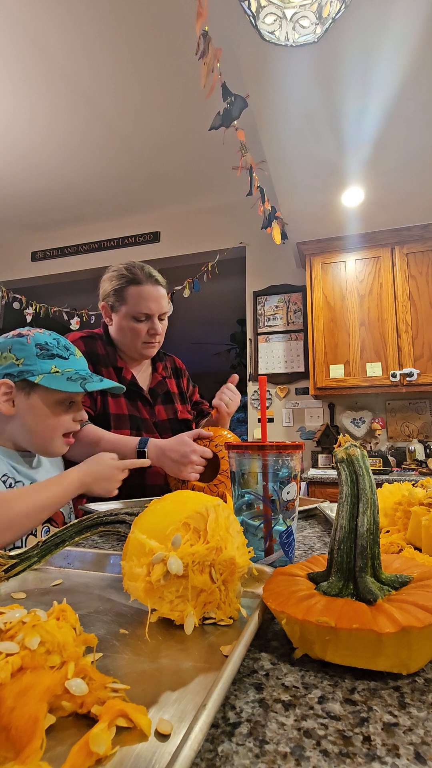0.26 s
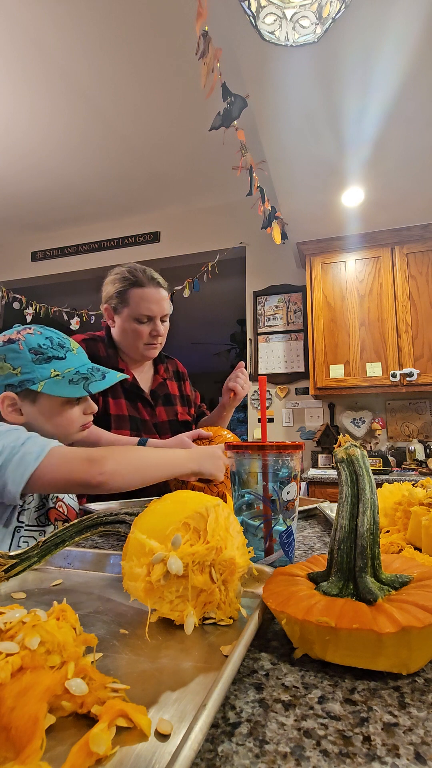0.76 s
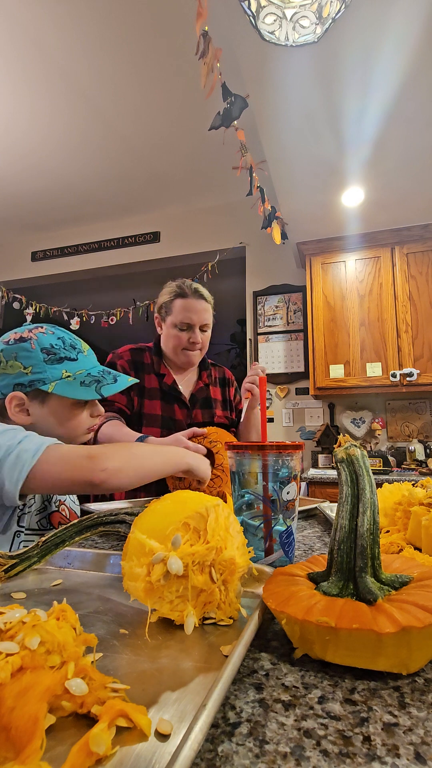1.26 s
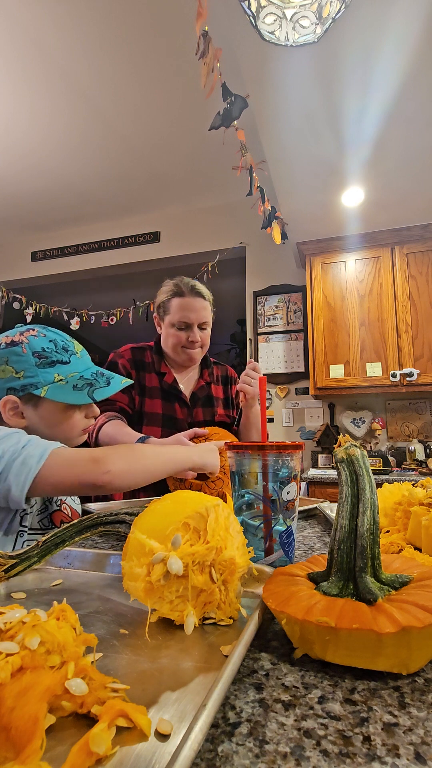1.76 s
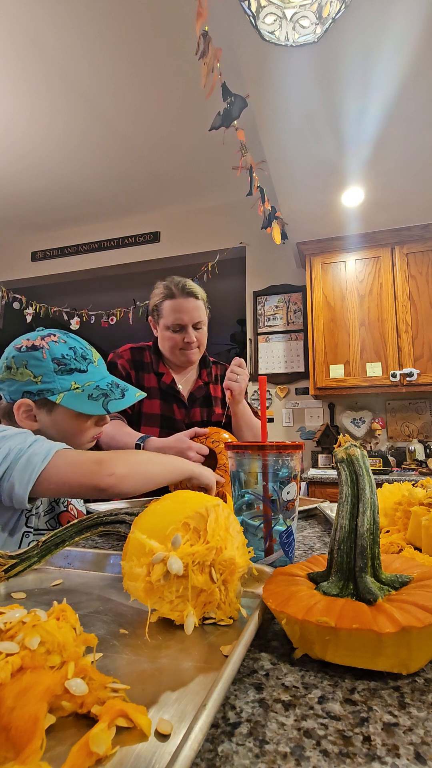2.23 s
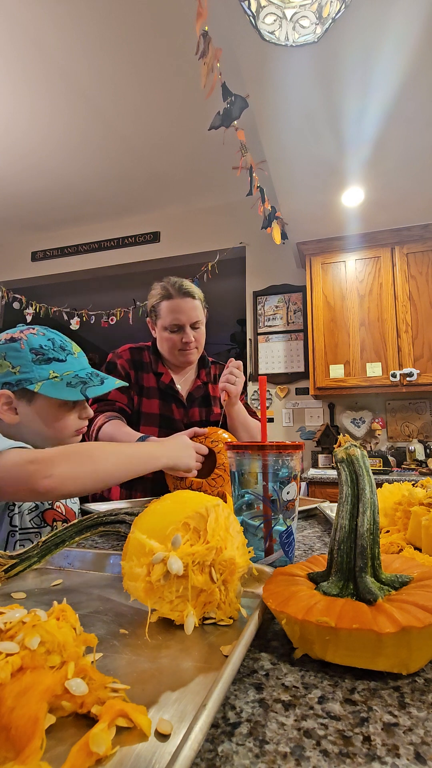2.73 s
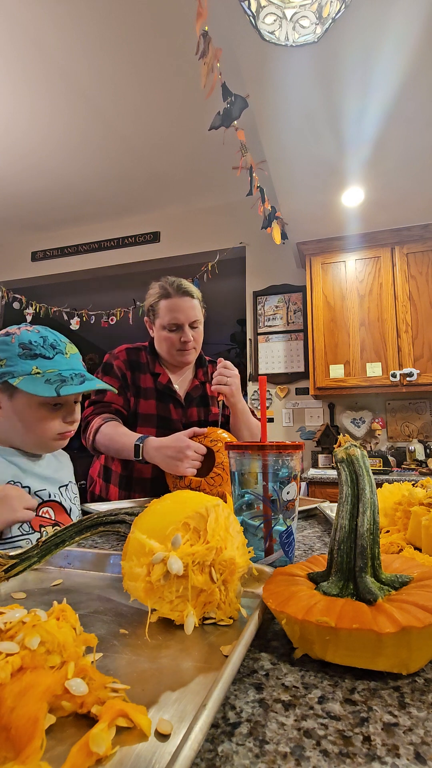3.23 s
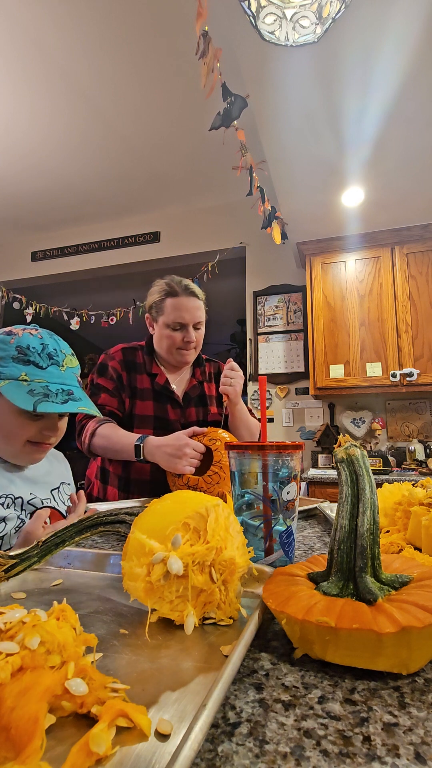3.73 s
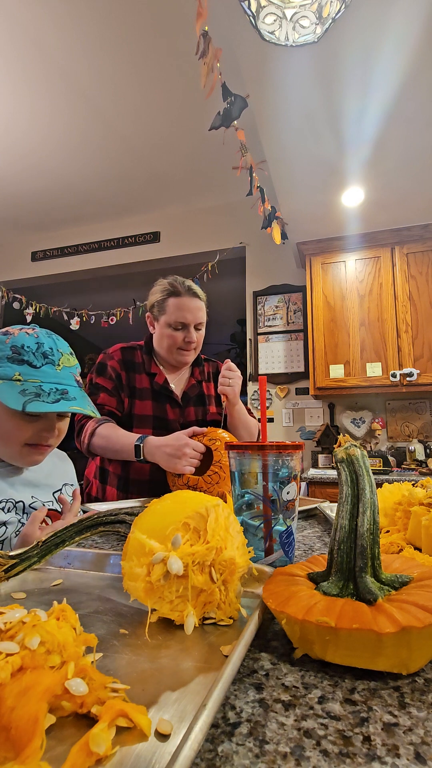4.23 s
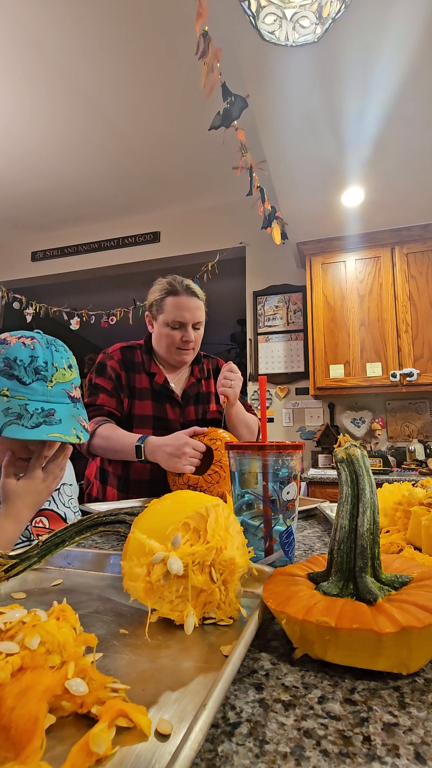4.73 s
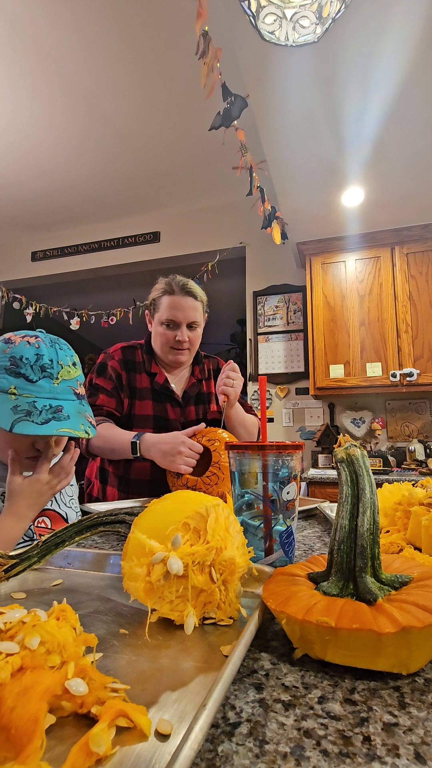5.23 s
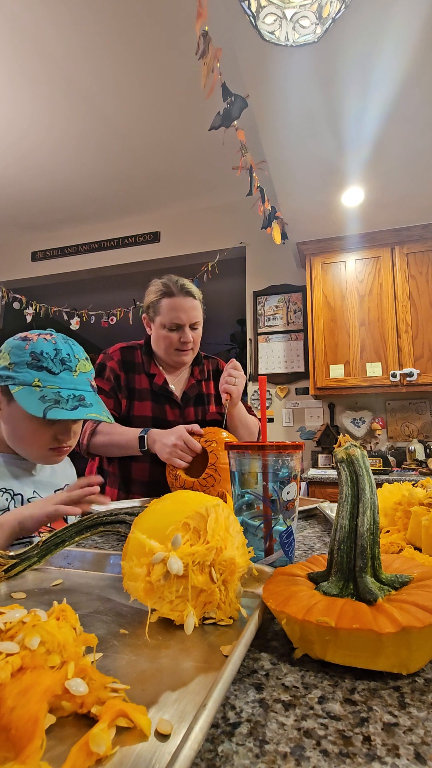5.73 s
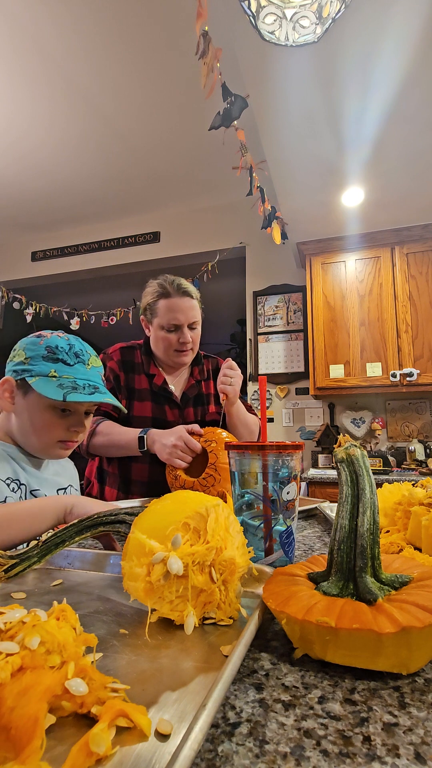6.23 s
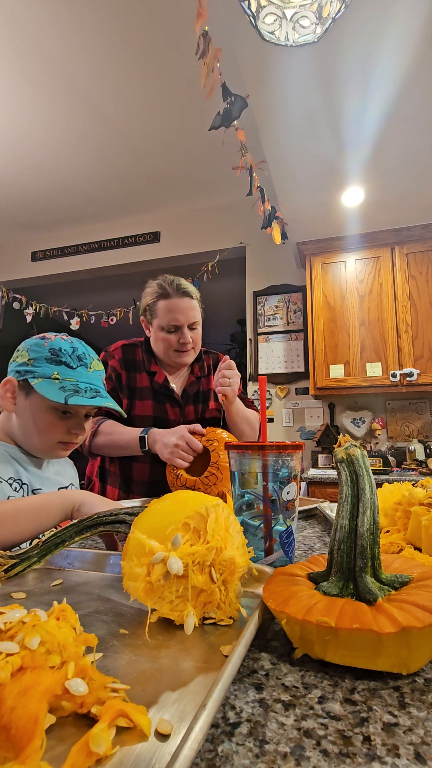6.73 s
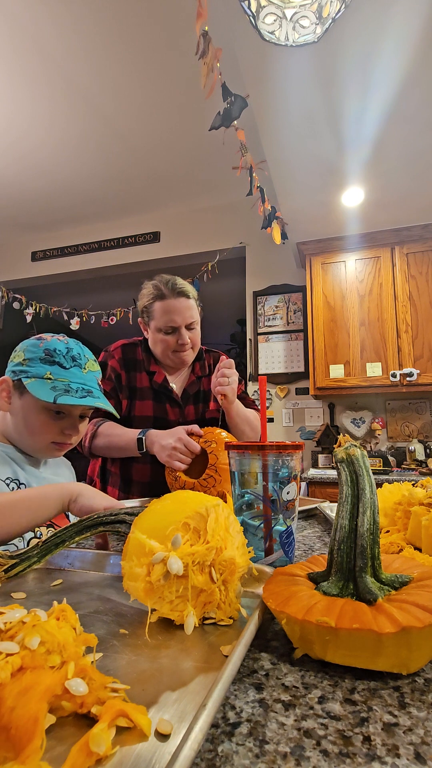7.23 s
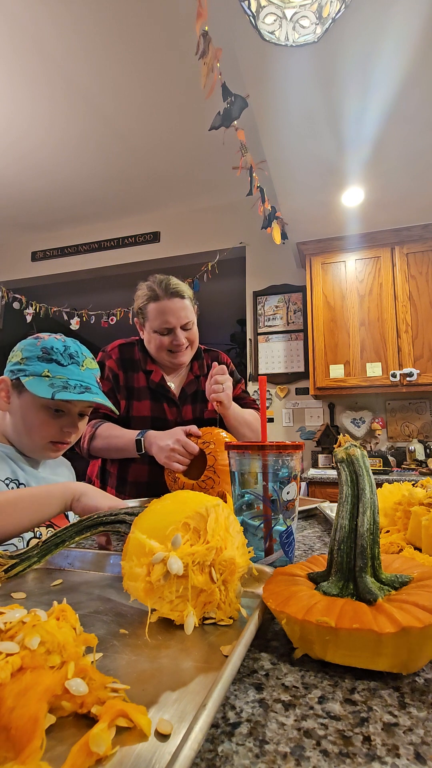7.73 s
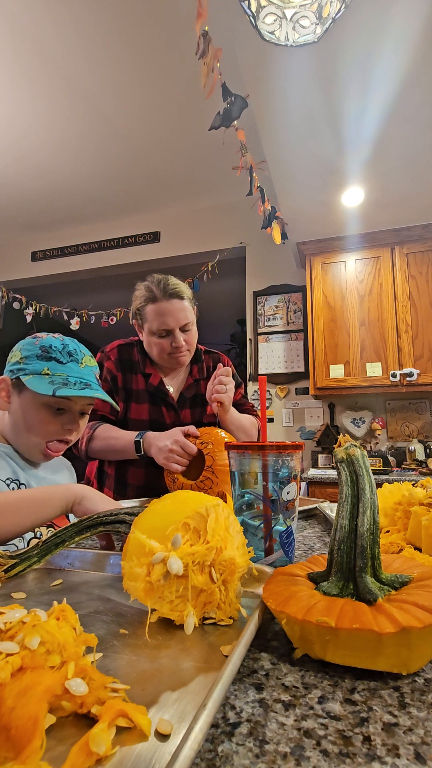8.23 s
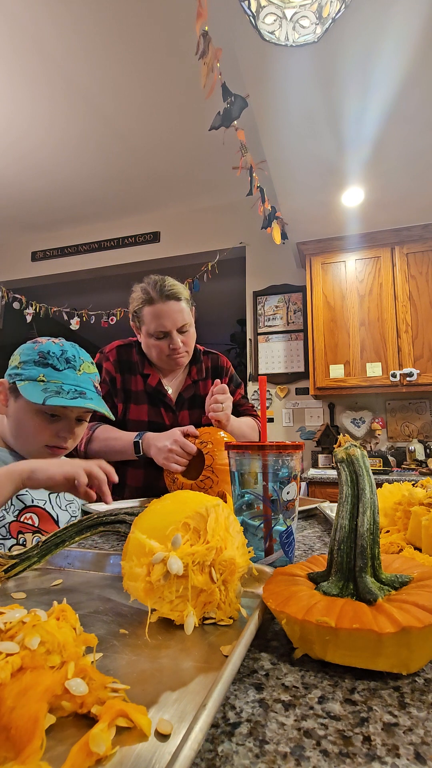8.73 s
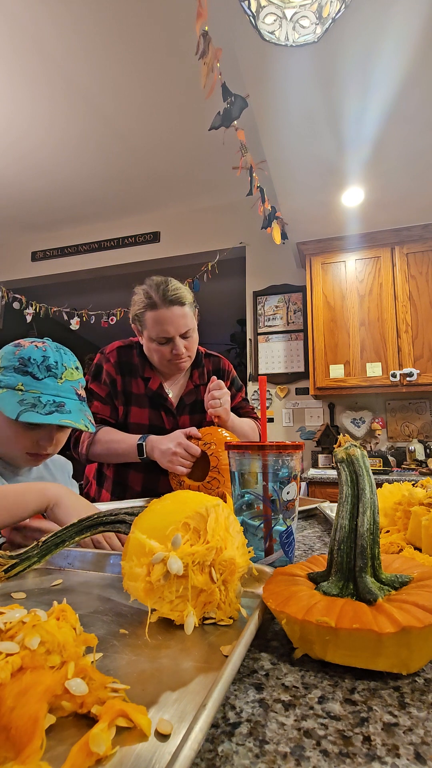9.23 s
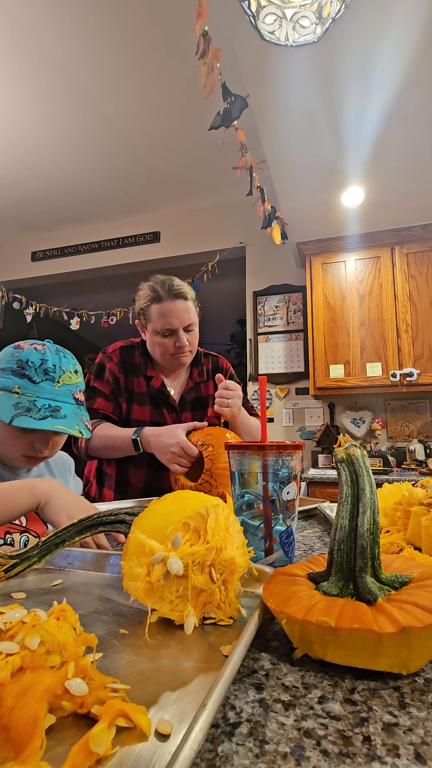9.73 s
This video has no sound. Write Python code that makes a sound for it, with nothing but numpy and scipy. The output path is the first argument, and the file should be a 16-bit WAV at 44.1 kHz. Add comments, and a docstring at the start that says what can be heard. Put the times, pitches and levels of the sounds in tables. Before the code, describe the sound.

A small blade saws through tough pumpkin rind at a kitchen counter, roughly two strokes a second. Each stroke stutters with wet crunches, creaks and fizzing juice, while the hollow shell thumps low. Strokes begin muted, grow harsher with sharp fibre snaps around the middle, then soften again. Wet fingers rustle faintly between strokes. Close stereo microphone on the counter, slightly stronger on the right, small lively room.

```python
"""Sawing pumpkin rind

A small knife saws thick rind on a kitchen counter, about two strokes a second, in a small, lively space.
Each stroke is a run of small slips with a few big ones: noise bursts of wet cells crunch, creak and fizz.
Every slip also shakes a resonant mode of the hollow shell. Fibres snap as clicks with splinter noise.
Wet fingers rustle, low decaying sines knock the counter; the leaning arm swells a low rumble under faint hiss."""
import sys
import numpy as np
from scipy import signal
from scipy.fft import rfft, irfft, next_fast_len
from scipy.io import wavfile
from scipy.ndimage import map_coordinates

SR = 44100
rng = np.random.default_rng(int(sys.argv[2]) if len(sys.argv) > 2 else 0)


def waveform_to_disk(signal):
    """Save audio, clipped to [-1, 1], as 16-bit WAV at the path in sys.argv[1]."""
    frames = np.transpose(np.atleast_2d(signal))
    scaled = np.clip(frames, -1, 1) * 32767
    samples = np.round(scaled).astype(np.int16)
    wavfile.write(sys.argv[1], SR, samples)


N = 440559  # samples

# Event levels and spectra are relative; the settings in scene() scale them.
# knife strokes: [start t/s, length/s, small-slip crunch level/dB, flesh creak re crunch level/dB,
# shell pitch f/Hz, lean on the counter level/dB]
STROKE_EVENTS = [(0.25, 0.313, -57, 3, 256.3, -45.5), (0.687, 0.284, -42.5, 0, 238.2, -43),
                 (1.174, 0.359, -54.5, 2, 233.9, -48.5), (1.858, .39, -48, -0.5, 243.9, -37),
                 (2.446, 0.2947, -40.5, 6.5, 259.7, -38), (2.958, 0.3002, -34, 0.5, 239.5, -42.5),
                 (3.482, 0.3332, -33.5, -0.5, 257.5, -42), (4.136, .19, -36, 1.5, 242.7, -39),
                 (4.558, 0.4162, -44, -1, 258.1, -46), (5.108, .40, -37, 0, 257.2, -42),
                 (5.642, .48, -43.5, -2, 261.5, -43.5), (6.311, .38, -42, -0.5, 267.9, -41.5),
                 (6.93, 0.307, -48, 0, 254.2, -34.5), (7.66, 0.161, -55.5, -5.5, 269.5, -35),
                 (8.079, 0.406, -47.5, 5, 270.2, -40), (8.621, 0.565, -47, 3.5, 267.7, -45),
                 (9.443, 0.4937, -49, 2.5, 263.7, -40)]
# blade sticks hard and breaks free: [t/s, rise/s, rind crunch level/dB, shell boom level/dB]
BIG_SLIPS = [(.263, 0.0231, -43, -29), (.365, 0.0065, -31.5, -20.5), (0.38, 0.0197, -33.5, -26),
             (.507, 0.0187, -48.5, -72), (.682, 0.0108, -50.5, -35.5), (.746, 0.0268, -38, -28.5),
             (.805, 0.0173, -37.5, -24.5), (.88, 0.02475, -30, -23.5), (1.046, 0.0174, -48.5, -41.5),
             (1.191, 0.00824, -48, -26.5), (1.252, 0.0346, -36.5, -25), (1.353, 0.0174, -33, -26),
             (1.395, 0.00735, -28, -26), (1.409, 0.0101, -48, -24.5), (1.532, 0.01573, -44.5, -39.5),
             (1.85, 0.0095, -43.5, -27.5), (1.872, 0.0181, -32.5, -27.5), (1.934, 0.018, -35, -25.5),
             (2.021, 0.02126, -26.5, -20), (2.07, .005, -24.5, -26), (2.16, 0.02406, -33.5, -34.5),
             (2.452, 0.0126, -50, -41), (2.487, 0.01215, -30.5, -27.5), (2.54, 0.0201, -32, -30.5),
             (2.624, 0.018, -35, -35.5), (2.694, 0.00637, -40, -28), (2.952, 0.0207, -54.5, -40.5),
             (3.024, 0.044, -32, -40.5), (3.065, 0.0341, -28, -28.5), (3.494, 0.00333, -29, -24.5),
             (3.516, 0.0037, -29.5, -26.5), (3.585, 0.0226, -26.5, -36.5), (3.617, 0.02255, -26.5, -19),
             (3.688, 0.0431, -33, -31.5), (3.78, 0.0146, -33, -29.5), (3.876, 0.0224, -46, -47.5),
             (3.976, 0.0166, -56.5, -33), (4.026, 0.0122, -43.5, -40.5), (4.12, 0.0323, -23, -27),
             (4.126, .008, -21.5, -23.5), (4.164, 0.0112, -20, -22.5), (4.216, 0.00943, -30.5, -22),
             (4.256, 0.00682, -25.5, -25.5), (4.56, 0.0146, -43.5, -37), (4.625, 0.01048, -24, -22.5),
             (4.659, 0.019, -29.5, -29.5), (4.701, 0.01274, -23, -22), (4.726, 0.01587, -18.5, -21),
             (4.785, 0.01777, -23.5, -18), (5.104, 0.0116, -49, -39.5), (5.21, 0.00493, -21.5, -24.5),
             (5.221, 0.01925, -22.5, -33), (5.295, .021, -21, -20.5), (5.362, 0.00777, -20, -12.5),
             (5.411, 0.0045, -33, -27), (5.506, 0.0227, -47, -37), (5.65, 0.015, -41.5, -31),
             (5.727, 0.01556, -31, -28), (5.814, 0.00763, -27, -23), (5.927, 0.01576, -32.5, -29.5),
             (5.964, 0.024, -35.5, -31.5), (6.035, 0.0074, -23.5, -14), (6.3, 0.0355, -45.5, -35.5),
             (6.398, 0.015, -40.5, -32), (6.53, 0.00715, -32.5, -29), (6.568, 0.0118, -31, -15),
             (6.607, 0.0097, -34, -22), (6.935, 0.0216, -42, -29.5), (6.997, 0.021, -32.5, -24.5),
             (7.085, 0.01635, -33, -23.5), (7.118, 0.01387, -37, -24.5), (7.674, 0.0107, -45, -38.5),
             (7.698, 0.0131, -46.5, -29), (7.955, .036, -51.5, -44), (8.089, 0.00628, -45.5, -25),
             (8.115, 0.0222, -35.5, -32), (8.24, 0.0324, -36, -30.5), (8.383, 0.00715, -39.5, -33.5),
             (8.482, 0.026, -49, -38.5), (8.63, 0.0294, -46.5, -32), (8.728, 0.0191, -66, -28.5),
             (8.85, 0.0204, -45, -44), (9.029, 0.0327, -38, -33.5), (9.069, 0.01156, -37.5, -24.5),
             (9.156, 0.00741, -44.5, -54), (9.515, 0.0308, -39.5, -28), (9.606, 0.03, -40, -34.5),
             (9.745, 0.02505, -35, -24)]
# single fibres snapping: [t/s, crack level/dB, spray re crack level/dB]
FIBRE_SNAPS = [(1.067, -35.5, -5.5), (1.195, -30.5, -13), (2.028, -20.5, -20.5), (2.073, -14.5, -22),
               (2.146, -15.5, -11.5), (2.466, -14.5, -23), (2.544, -12.5, -21.5), (3.007, -16, -22.5),
               (3.497, -22, -25), (3.889, -23, -5), (3.894, -19, -21), (4.029, -24.5, -12),
               (4.617, -19.5, -17), (4.708, -14, -14.5), (4.952, -25.5, -12), (5.23, -4.5, -11.5),
               (5.311, -11.5, -13), (5.513, -25, -23), (5.597, -32.5, -34), (5.879, -23.5, 1.5),
               (6.314, -17.5, -25.5), (6.326, -15, -28.5), (6.399, -24, -13.5), (6.465, -19, -15.5),
               (7.092, -18.5, -26), (7.121, -16, -16.5), (7.157, -19.5, -14), (8.005, -30, -18),
               (8.093, -31, -11.5), (9.161, -26, -17)]
# soft knocks of pumpkin and hands on the counter: [t/s, level/dB, f/Hz]
COUNTER_KNOCKS = [(0.689, -28, 137.5), (0.806, -24, 165), (1.195, -26, 155), (1.702, -31.5, 247.3),
                  (1.85, -26.5, 161), (2.04, -27, 162.6), (2.376, -31.5, 113.5), (2.973, -30.5, 115.7),
                  (3.448, -28.5, 115), (3.985, -25.5, 109), (4.133, -26.5, 142.4), (7.682, -32.5, 483.8),
                  (7.709, -28, 60), (8.674, -23.5, 415.2), (8.689, -26.5, 528.4), (9.773, -16.5, 59.99)]
# wet fingers shifting grip between strokes: [t/s, rise/s, rustle level/dB, dull bump level/dB]
GRIP_SHIFTS = [(0.0, 0.0115, -58.5, -47.5), (0.16, 0.079, -62, -65), (0.55, 0.039, -56, -74.5),
               (1.686, 0.0382, -60.5, -50), (2.365, 0.0271, -50.5, -47.5), (3.31, 0.023, -58.5, -53),
               (4.41, .008, -54.5, -69.5), (6.15, 0.047, -57, -54), (7.501, 0.023, -56.5, -67.5),
               (7.87, 0.0349, -57.5, -41.5), (9.34, 0.0246, -58, -47)]

# hard rind radiating a fracture: [f/Hz, level/dB]
RIND_SPECTRUM = [(600, -41.5), (1800, -21), (2500, -9), (2900, 3), (3300, -5), (3550, -2.5), (4150, -4.5),
                 (5200, -16), (7000, -21), (12000, -49)]
# duller creak of flesh gripping the blade: [f/Hz, level/dB]
FLESH_SPECTRUM = [(150, -20), (400, -3.5), (620, -8), (850, 2.5), (1050, -8.5), (1330, -2.5), (1600, -7.5),
                  (2100, -5), (2600, -17), (5000, -38)]
# fizz of bursting wet cells: [f/Hz, level/dB]
SPRAY_SPECTRUM = [(2000, -34.5), (5200, -14.5), (7300, 1.5), (9200, -6.5), (11500, 2), (13000, -5.5),
                  (16000, -8.5)]
# bright tick of one fibre: [f/Hz, level/dB]
TICK_SPECTRUM = [(300, -7.5), (900, -9), (2000, -0.5), (2500, -4.5), (3300, 1), (4200, -7.5), (5300, -18),
                 (9000, -38.5)]
# shell radiating its flexing: [f/Hz, level/dB]
SHELL_SPECTRUM = [(20, -14), (70, -4), (125, -9), (190, 0), (260, 1), (340, 0.5), (500, 4.5), (900, 5),
                  (2500, -36)]
# shell nudged by the fingers: [f/Hz, level/dB]
BUMP_SPECTRUM = [(100, -21.5), (200, -8), (270, 0), (380, -11.5), (600, -26.5), (3000, -54.5)]
# rumble of the leaned-on counter: [f/Hz, level/dB]
RUMBLE_SPECTRUM = [(10, -5.5), (30, -5), (70, -7), (130, -16), (400, -37.5), (1500, -100.5)]
# faint background hiss: [f/Hz, level/dB]
HISS_SPECTRUM = [(30, -30.5), (60, -21.5), (120, -11), (170, -14), (280, -9.5), (460, -23.5), (1400, -34.5),
                 (3300, -35.5), (5600, -40), (7500, -36), (9000, -38.5), (12000, -32), (16000, -37.5)]

# kitchen reverberation: [f/Hz, t60/s]
KITCHEN_T60 = [(150, 0.418), (400, 0.318), (1000, 0.274), (3000, 0.3096), (7000, 0.252), (15000, 0.189)]
# left minus right: [f/Hz, level/dB]
LEFT_RIGHT_LEVEL = [(100, -0.5), (260, -1), (500, -2), (1000, -8), (2000, -6), (4000, -3.5), (8000, -3.5),
                    (11500, -12), (15000, 2.5)]
# left phase lead, sound bending round things on the counter: [f/Hz, phase/rad]
LEFT_PHASE_LEAD = [(100, 0.4), (300, 0.1039), (600, -2.33), (950, 0.58), (1380, -0.18), (2070, 1.06),
                   (3010, 5), (3700, 7.5), (5500, 12), (7750, 16), (11000, 23), (16000, 30)]

TOP_HZ = 16100
SMALL_SLIPS_PER_S = 28
# small slips: median rise, unevenness, drop at both ends of a stroke
SMALL_RISE_S, SMALL_SCATTER_DB, SMALL_FADE_DB = .0115, -1.5, 10.5
RISE_SCATTER = .5  # natural log of the rise time
# small-slip boom at a medium crunch; dB of boom per dB of crunch
SMALL_BOOM_DB, BOOM_DB_PER_DB = -39.5, 0.38
# spray relative to a medium crunch; harder slips are drier, dB per dB
MEDIUM_CRUNCH_DB, WET_DB, WET_FALL_DB_PER_DB = -38.5, -4, 0.14
PITCH_SCATTER = .03  # share of shell pitch, slip to slip
# as the blade sinks in over a stroke: more creak, less spray, stiffer shell (share of pitch)
DEEPER_CREAK_DB, DEEPER_DRY_DB, DEEPER_PITCH = 3, 4, 0.0698
# lean peaks after mid-stroke; width is a share of stroke length; level at rest
LEAN_LAG_S, LEAN_WIDTH, LEAN_REST_DB = .02, 0.3646, -58
# the hiss flickers mostly above this frequency
FLICKER_DB, FLICKER_HZ = 2.68, 6973


def amp(db):
    """Decibels to gain."""
    return 10 ** (np.asarray(db) / 20)


def unit(x):
    """Scale to rms 1."""
    return x / np.sqrt(np.mean(x ** 2) + 1e-20)


def along(points, hz):
    """Interpolate a frequency table on a log axis."""
    f, v = np.transpose(points)
    return np.interp(np.log(hz + 1), np.log(f + 1), v)


def filtered(x, response):
    """Apply a complex frequency response."""
    m = next_fast_len(N + SR // 2)
    spectrum = rfft(x, m) * response(np.fft.rfftfreq(m, 1 / SR))
    return irfft(spectrum, m)[..., :N]


def ring(points, size=2048):
    """Minimum-phase impulse response of energy 1 with the given spectrum."""
    cepstrum = irfft(np.log(amp(along(points, np.fft.rfftfreq(size, 1 / SR)))))
    # fold onto positive time, so the response is causal
    cepstrum[1:size // 2] *= 2
    cepstrum[size // 2 + 1:] = 0
    h = irfft(np.exp(rfft(cepstrum)))
    return h / np.linalg.norm(h)


def coloured(x, points):
    """Ring x through a body with the given spectrum."""
    return signal.fftconvolve(np.atleast_2d(x), ring(points)[None], axes=1)[:, :N]


def add(track, t_s, x):
    """Mix x into the track from t_s."""
    start = max(0, round(t_s * SR))
    part = track[..., start:start + x.shape[-1]]
    part += x[..., :part.shape[-1]]


def wobble(n, rate_hz):
    """Smooth random curve of n samples, rate_hz knots a second."""
    knots = rng.standard_normal(int(n * rate_hz / SR) + 4)
    return map_coordinates(knots, [np.arange(n) * rate_hz / SR])


def leaning():
    """Arm weight on the counter swells and eases with every stroke."""
    t = np.arange(0, N, 100) / SR
    weight = np.zeros(len(t))
    for start, length, *_, db in STROKE_EVENTS:
        peak = start + length / 2 + LEAN_LAG_S
        weight += amp(db) * np.exp(-((t - peak) / (LEAN_WIDTH * length)) ** 2 / 2)
    return np.interp(np.arange(N) / SR, t, np.hypot(weight, amp(LEAN_REST_DB)))


def background(rumble_db, quiet_db):
    """Counter rumble follows the lean; faint hiss wavers slowly, treble flickers, bass is near mono."""
    rumble = unit(filtered(rng.standard_normal(N), lambda hz: amp(along(RUMBLE_SPECTRUM, hz))))
    noise = rng.standard_normal((2, N))
    mid, side = filtered(noise, lambda hz: amp(along(HISS_SPECTRUM, hz)))
    side = filtered(side, lambda hz: 1.1 * hz / (hz + 900))
    hiss = unit(np.array([mid + side, mid - side]))
    treble = filtered(hiss, lambda hz: 1 - np.exp(-(hz / FLICKER_HZ) ** 4))
    hiss = hiss - treble + amp(FLICKER_DB * wobble(N, 5.4)) * treble
    hiss_gain = amp(quiet_db + .8 * wobble(N, 3))
    return amp(rumble_db) * leaning() * rumble + hiss_gain * hiss


def slip_speed(rise_s):
    """Sliding speed in one slip: breaks loose, peaks near 1 after the rise, sticks again."""
    rise_s = max(rise_s, .002)
    u = np.arange(int(np.pi * SR * rise_s)) / (SR * rise_s)
    return u * np.exp((1 - u * u) / 2)


def fractures(n, per_second, scatter_db, rub, aim=0.42):
    """Cells burst at random with uneven sizes over smooth rubbing; stereo, rms 1."""
    chance, size = rng.random(n), rng.standard_normal(n)
    noise = rng.standard_normal((n, 5)).T
    bursts = (chance < per_second / SR) * amp(scatter_db * np.clip(size, -2, 2))
    # each cell radiates its own way, so the two microphones get different shares
    bursts = unit(bursts * (np.sign(noise[0]) + aim * noise[1:3]))
    rubbing = rub * (noise[0] + aim * noise[3:])
    return unit(bursts + rubbing)


def pressed(speed, grains):
    """Shape grains by the slip speed; total energy is set by the speed."""
    x = speed * grains
    return x * np.linalg.norm(speed) / np.linalg.norm(x)


def gripping(rustle_db, bump_db):
    """Fingers slide on wet skin as dense fractures and nudge the shell as low noise."""
    slide, bump = np.zeros((2, N)), np.zeros(N)
    for t_s, rise_s, db, low_db in GRIP_SHIFTS:
        speed = slip_speed(rise_s)
        grains = fractures(len(speed), per_second=3000, scatter_db=7, rub=0.46)
        add(slide, t_s, amp(db + rustle_db) * pressed(speed, grains))
        add(bump, t_s, amp(low_db + bump_db) * speed * rng.standard_normal(len(speed)))
    rustle = coloured(slide, SPRAY_SPECTRUM) + 0.87 * coloured(slide, TICK_SPECTRUM)
    return rustle + coloured(bump, BUMP_SPECTRUM)


def small_slips():
    """Blade stutters, hardest mid-stroke: rows [t/s, rise/s, crunch level/dB, boom level/dB]."""
    rows = []
    for start, length, db, *_ in STROKE_EVENTS:
        count = round(length * SMALL_SLIPS_PER_S)
        place = (np.arange(count) + rng.random(count)) / count
        size, sharp = np.clip(rng.standard_normal((count, 2)), -2, 2).T
        crunch_db = db - SMALL_FADE_DB * (2 * place - 1) ** 2 + SMALL_SCATTER_DB * size
        rise_s = SMALL_RISE_S * np.exp(RISE_SCATTER * sharp)
        boom_db = SMALL_BOOM_DB + BOOM_DB_PER_DB * (crunch_db - MEDIUM_CRUNCH_DB)
        rows += zip(start + length * place - rise_s, rise_s, crunch_db, boom_db)
    return rows


def slips():
    """All slips, set by stroke and blade depth.

    Rows: [t/s, rise/s, crunch level/dB, creak and spray re crunch level/dB, boom level/dB, f/Hz].
    """
    t_s, rise_s, crunch_db, boom_db = np.transpose(BIG_SLIPS + small_slips())
    start, length, _, flesh_db, hz, _ = np.transpose(STROKE_EVENTS)
    middle = start + length / 2
    stroke = np.argmin(np.abs(t_s[:, None] - middle) - length / 2, axis=1)
    depth = np.clip((t_s + rise_s - middle[stroke]) / length[stroke], -.5, .5)
    creak_db = flesh_db[stroke] + DEEPER_CREAK_DB * depth
    wet_db = WET_DB - WET_FALL_DB_PER_DB * (crunch_db - MEDIUM_CRUNCH_DB) - DEEPER_DRY_DB * depth
    scatter = PITCH_SCATTER * rng.standard_normal(len(t_s))
    pitch_hz = hz[stroke] * (1 + DEEPER_PITCH * depth + scatter)
    return np.transpose([t_s, rise_s, crunch_db, creak_db, wet_db, boom_db, pitch_hz])


def cutting(moves, crunch_db, creak_db, spray_db):
    """Slips crack rind, judder through flesh and burst juicy cells; returns crunch and spray."""
    crack, creak, fizz = np.zeros((3, 2, N))
    for t_s, rise_s, db, flesh_db, wet_db, _, _ in moves:
        speed = slip_speed(rise_s)
        n = len(speed)
        # fibres give way in bundles, a few milliseconds apart
        bundles = amp(2.5 * np.clip(wobble(n, 300), -1.5, 1.5))
        cells = fractures(n, per_second=800, scatter_db=4, rub=0.476, aim=0.378)
        flesh = fractures(n, per_second=700, scatter_db=1, rub=0.407, aim=0.098)
        judder = unit(cells + 1.695 * flesh)
        juice = unit(cells + fractures(n, per_second=1100, scatter_db=5, rub=0.58, aim=0.9))
        add(crack, t_s, amp(db + crunch_db) * pressed(speed, bundles * cells))
        add(creak, t_s, amp(db + flesh_db + creak_db) * pressed(speed, bundles * judder))
        add(fizz, t_s, amp(db + wet_db + spray_db) * pressed(speed, bundles * juice))
    crunch = coloured(crack, RIND_SPECTRUM) + coloured(creak, FLESH_SPECTRUM)
    return crunch, coloured(fizz, SPRAY_SPECTRUM)


def shell(moves, boom_db, width_hz):
    """Each slip's noisy force shakes a damped shell mode; pitch shifts with grip and place of cut."""
    boom, t = np.zeros(N), np.arange(SR // 10) / SR
    for t_s, rise_s, *_, db, hz in moves:
        speed = slip_speed(rise_s)
        mode = np.sin(2 * np.pi * hz * t) * np.exp(-np.pi * width_hz * t)
        flex = signal.fftconvolve(speed * rng.standard_normal(len(speed)), mode)
        # energy set by the force and length of the slip
        flex *= np.linalg.norm(speed) / np.linalg.norm(flex)
        add(boom, t_s, amp(db + boom_db) * flex)
    return filtered(boom, lambda hz: amp(along(SHELL_SPECTRUM, hz)))


def rocking(knock_db, t60_s, attack_s):
    """Soft, heavy counter contacts: a decaying sine with a soft attack each."""
    out, t = np.zeros(N), np.arange(SR // 4) / SR
    for t_s, db, hz in COUNTER_KNOCKS:
        envelope = amp(db + knock_db - 60 * t / t60_s) * (1 - np.exp(-t / attack_s))
        add(out, t_s, envelope * np.sin(2 * np.pi * hz * t))
    return out


def snapping(snap_db, spray_db, splinter, t60_s):
    """Each fibre snap is one sharp impulse, 1 ms after its listed time, with decaying splinter noise."""
    crack, fizz = np.zeros((2, N))
    t = np.arange(SR // 50) / SR
    for t_s, db, wet_db in FIBRE_SNAPS:
        snap = splinter * rng.standard_normal(len(t)) * amp(-60 * t / t60_s) - (t == 0)
        add(crack, t_s + .001, amp(db + snap_db) * snap)
        add(fizz, t_s + .001, amp(db + wet_db + spray_db) * snap)
    return coloured(crack, TICK_SPECTRUM) + coloured(fizz, SPRAY_SPECTRUM)


def kitchen(x, near_db, tail_db, alike, spread_s, count=14):
    """Short early reflections, then a decaying tail, both redrawn at random every fifth of a second."""
    out, step = np.zeros((2, N)), SR // 5
    for start in range(0, N, step):
        noise = rng.standard_normal((3, SR // 3))
        # the shared noise makes the two sides alike
        hz, t, z = signal.stft(noise[:2] + alike * noise[2], SR, nperseg=256)
        decay = amp(-60 * t / along(KITCHEN_T60, hz)[:, None]) * (1 - np.exp(-t / 0.002))
        tail = signal.istft(z * decay, SR, nperseg=256)[1]
        near = np.zeros_like(tail)
        for side in near:
            delay_s = .0002 + spread_s * rng.random(count) ** 2
            side[(delay_s * SR).astype(int)] = rng.standard_normal(count)
        near = amp(near_db) * near / np.linalg.norm(near, axis=1, keepdims=True)
        tail = amp(tail_db) * tail / np.linalg.norm(tail, axis=1, keepdims=True)
        block = np.atleast_2d(x)[:, start:start + step]
        add(out, start / SR, signal.fftconvolve(block, near + tail, axes=1))
    return out


def ports(x):
    """Direct sound at both microphones, the phase lead split between them."""
    halves = np.array([[.5], [-.5]])
    return filtered(x, lambda hz: np.exp(1j * along(LEFT_PHASE_LEAD, hz) * halves))


def shading(hz):
    """Left and right gains of equal total power; right is louder over most of the band."""
    gains = amp(along(LEFT_RIGHT_LEVEL, hz) * np.array([[.5], [-.5]]))
    return gains / np.sqrt(np.mean(gains ** 2, axis=0))


def scene():
    """Crunch, spray, snaps and boom, direct and through the kitchen, over the background."""
    moves = slips()
    crunch, spray = cutting(moves, crunch_db=-1.5, creak_db=-0.5, spray_db=-2.5)
    spray = spray + gripping(rustle_db=-3.0, bump_db=-0.5)
    boom = shell(moves, boom_db=0.5, width_hz=33.1)
    boom = boom + rocking(knock_db=2.0, t60_s=0.0904, attack_s=0.0034)
    snaps = snapping(snap_db=8, spray_db=9.0, splinter=0.099, t60_s=0.011)
    # clutter on the counter scatters much of the treble on its way
    answer = kitchen(crunch, near_db=2.0, tail_db=-5.0, alike=0.076, spread_s=.0025, count=24)
    answer += kitchen(spray, near_db=4.5, tail_db=-0.5, alike=.1, spread_s=.002, count=24)
    answer += kitchen(snaps, near_db=0, tail_db=-5.5, alike=0.18, spread_s=0.0011)
    answer += kitchen(boom, near_db=-16.5, tail_db=-10, alike=3.8, spread_s=0.0054)
    direct = ports(crunch + spray + snaps + boom)
    return filtered(direct + answer, shading) + background(rumble_db=-1.5, quiet_db=-58.0)


def record(dry):
    """Keep nothing above the band limit."""
    return filtered(dry, lambda hz: hz < TOP_HZ)


dry = scene()
out = record(dry)
waveform_to_disk(out)
```